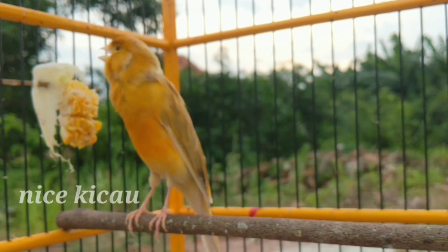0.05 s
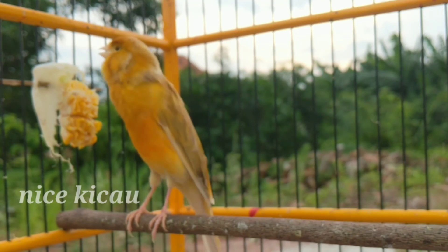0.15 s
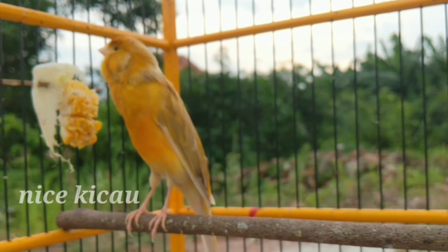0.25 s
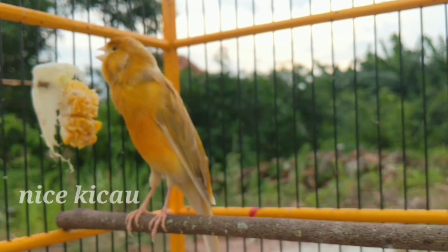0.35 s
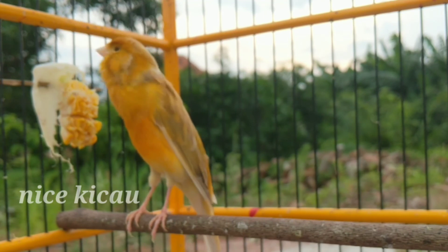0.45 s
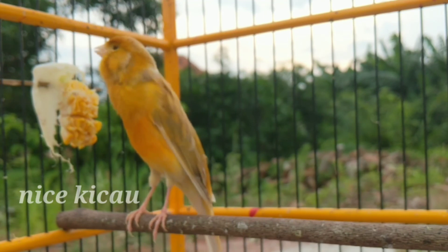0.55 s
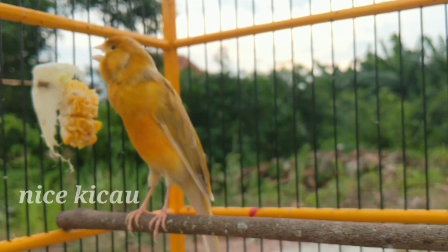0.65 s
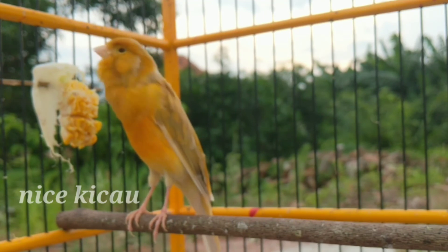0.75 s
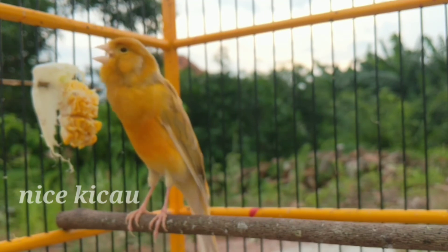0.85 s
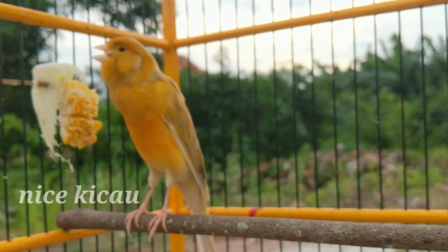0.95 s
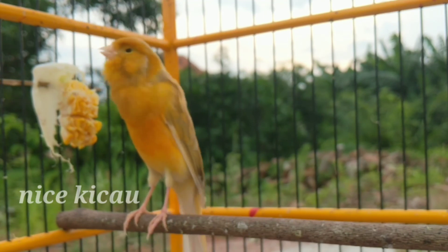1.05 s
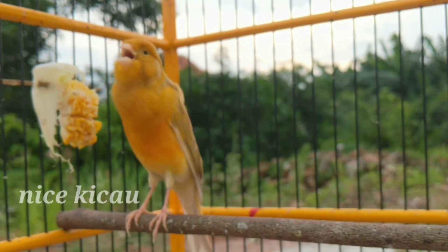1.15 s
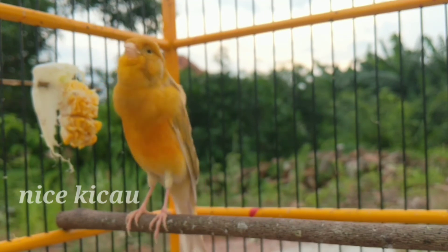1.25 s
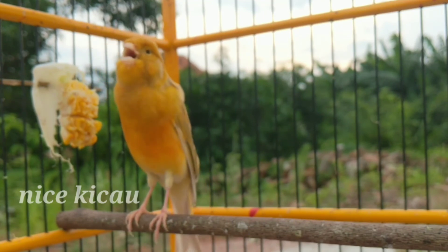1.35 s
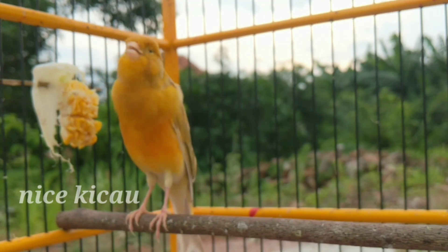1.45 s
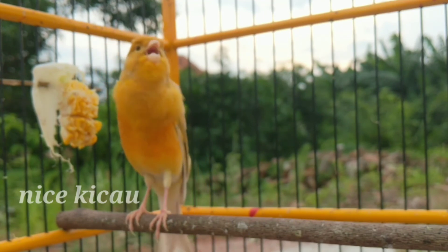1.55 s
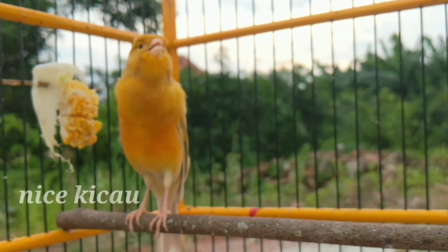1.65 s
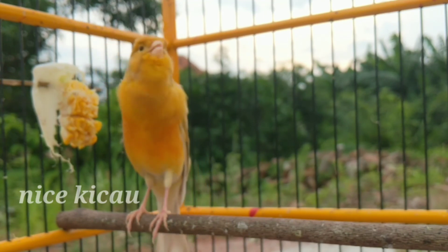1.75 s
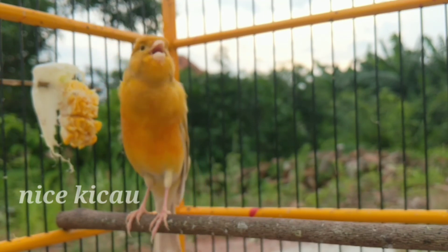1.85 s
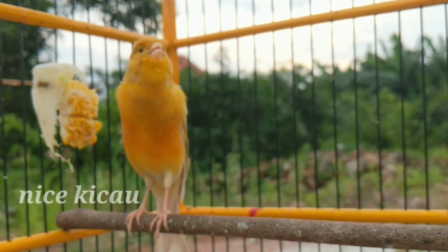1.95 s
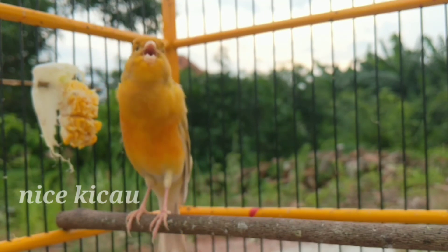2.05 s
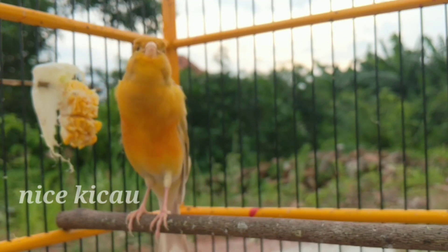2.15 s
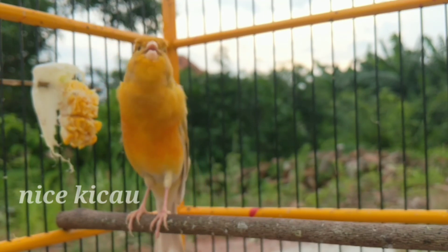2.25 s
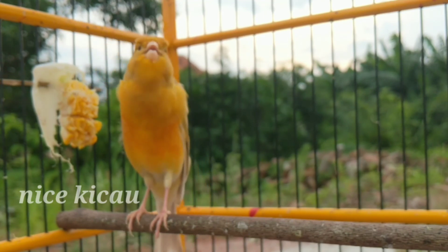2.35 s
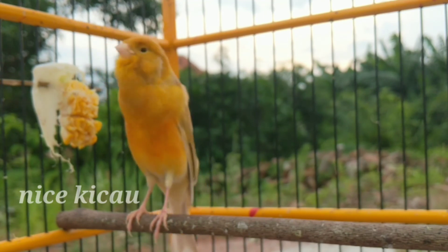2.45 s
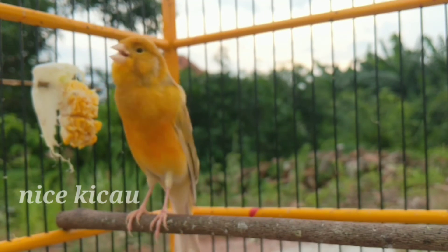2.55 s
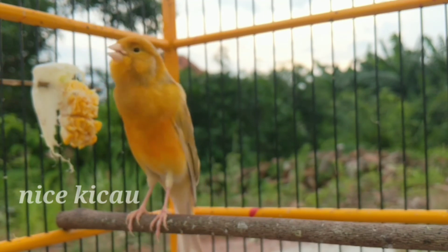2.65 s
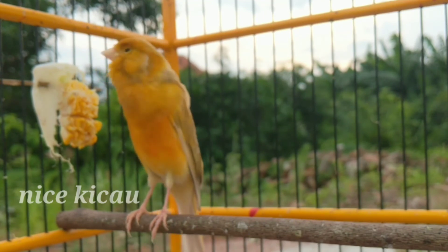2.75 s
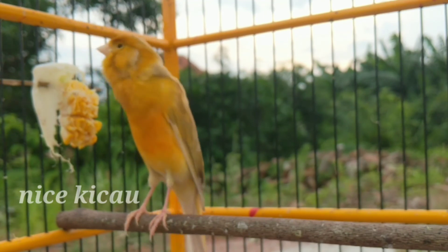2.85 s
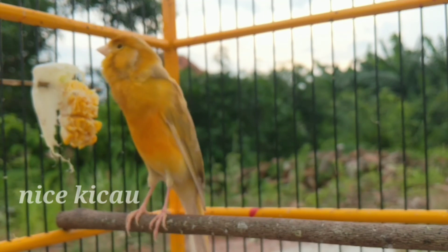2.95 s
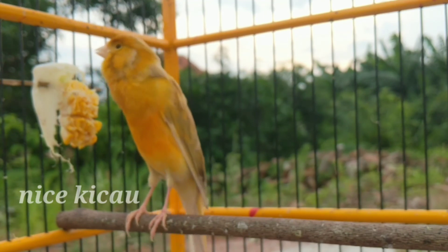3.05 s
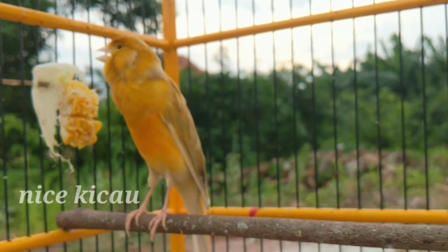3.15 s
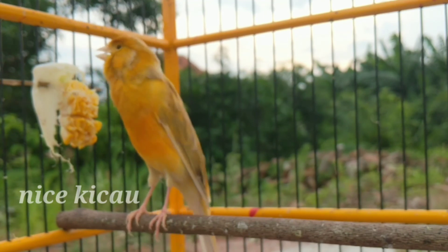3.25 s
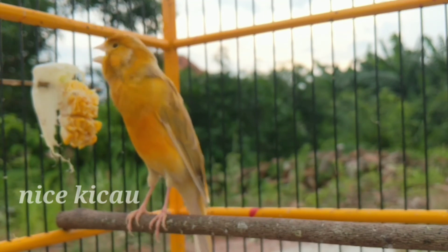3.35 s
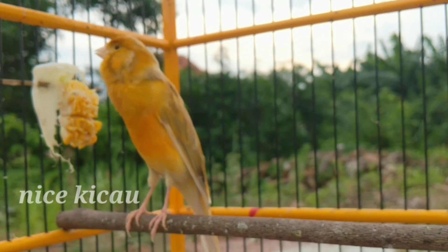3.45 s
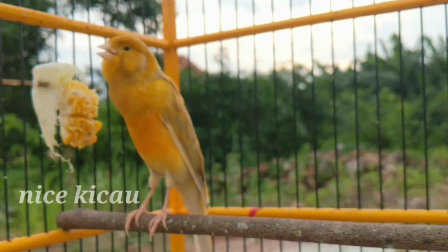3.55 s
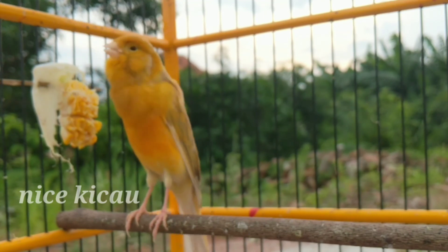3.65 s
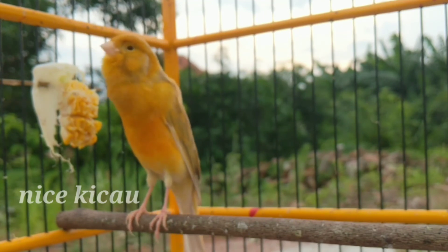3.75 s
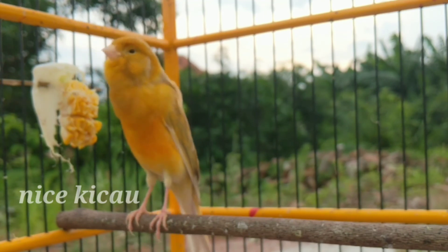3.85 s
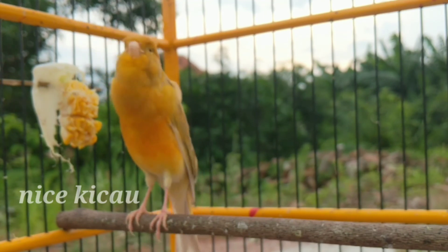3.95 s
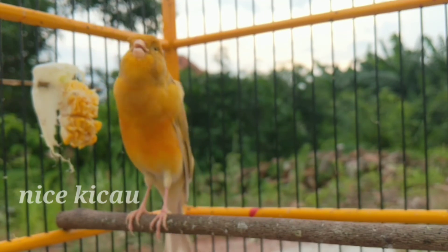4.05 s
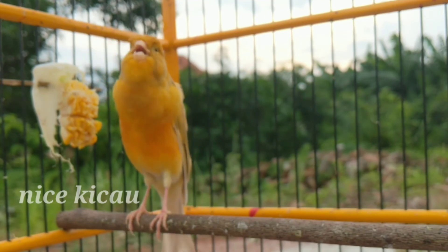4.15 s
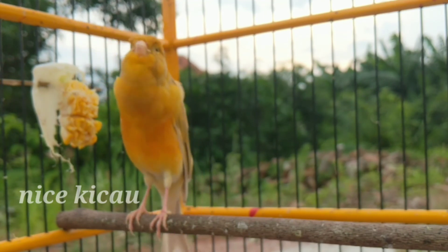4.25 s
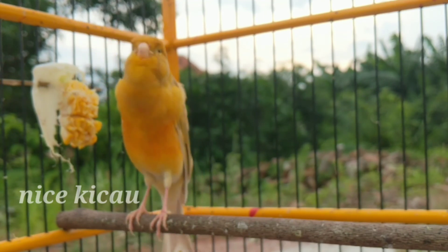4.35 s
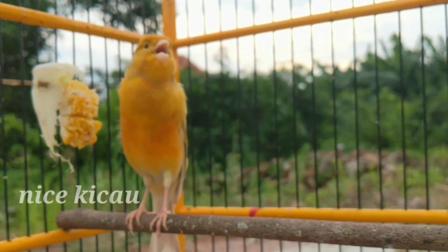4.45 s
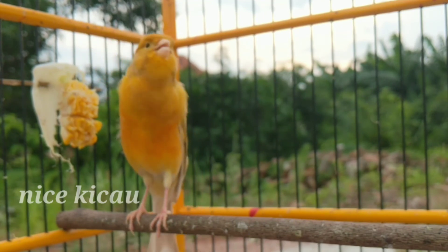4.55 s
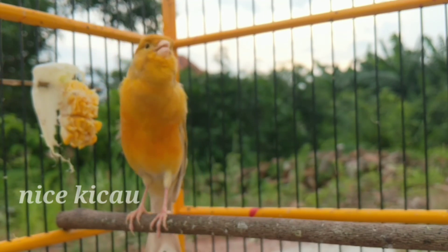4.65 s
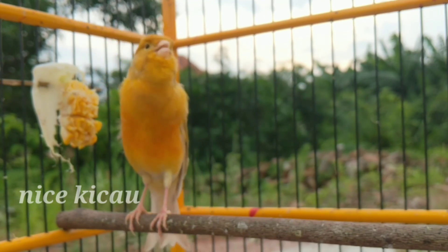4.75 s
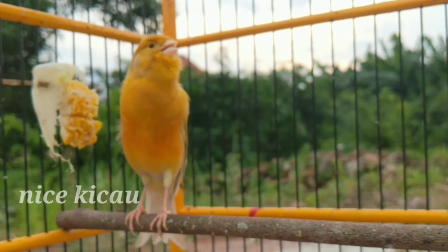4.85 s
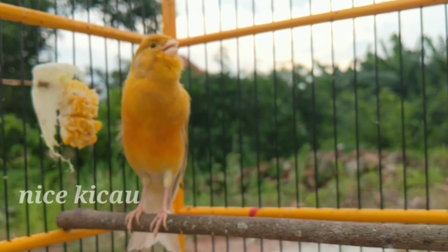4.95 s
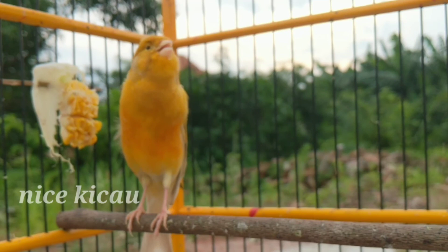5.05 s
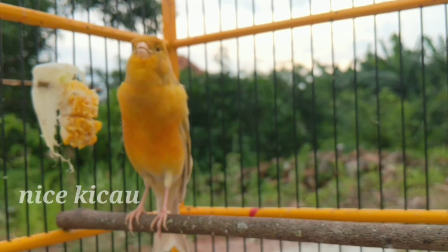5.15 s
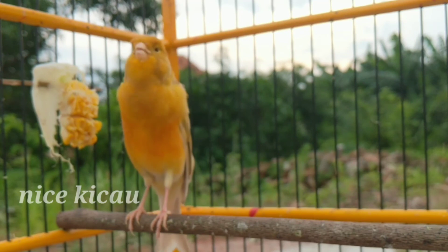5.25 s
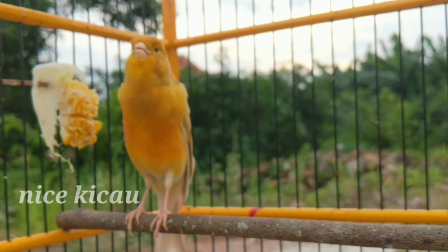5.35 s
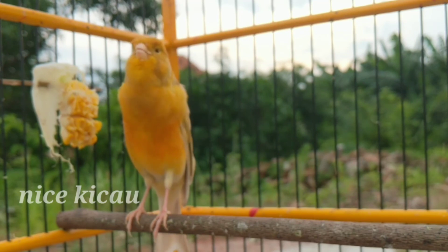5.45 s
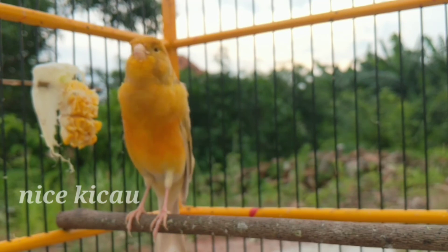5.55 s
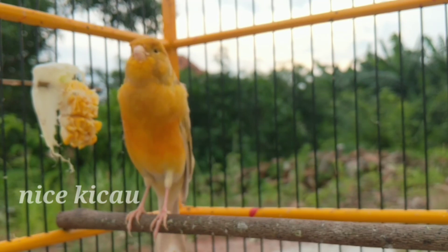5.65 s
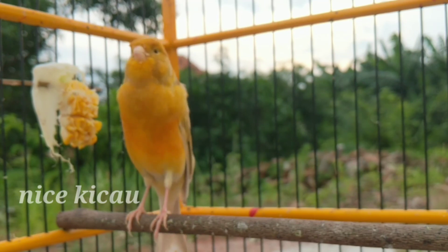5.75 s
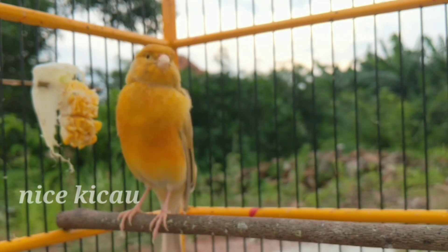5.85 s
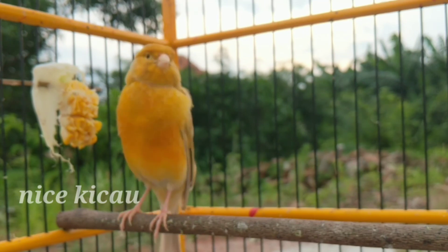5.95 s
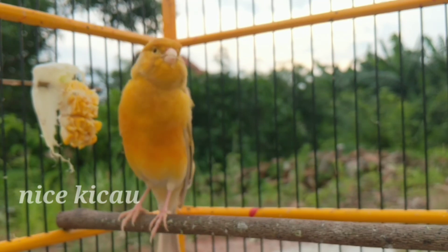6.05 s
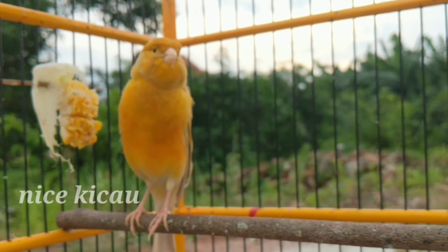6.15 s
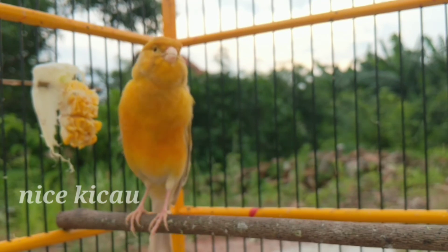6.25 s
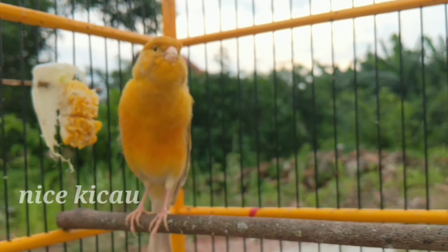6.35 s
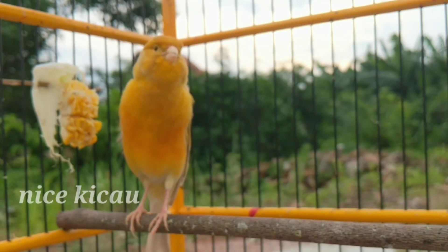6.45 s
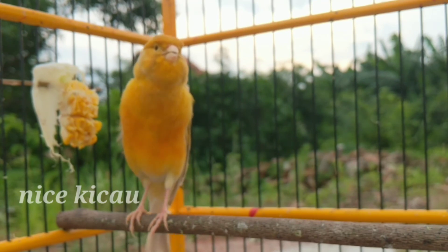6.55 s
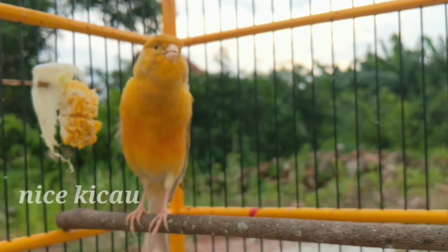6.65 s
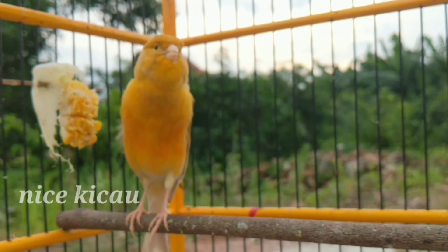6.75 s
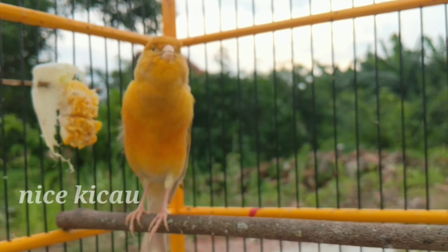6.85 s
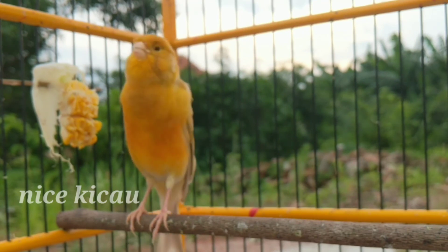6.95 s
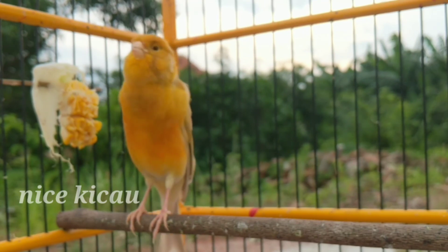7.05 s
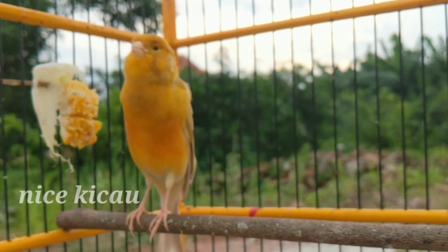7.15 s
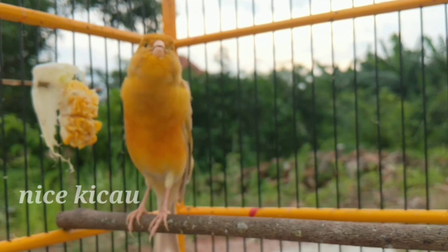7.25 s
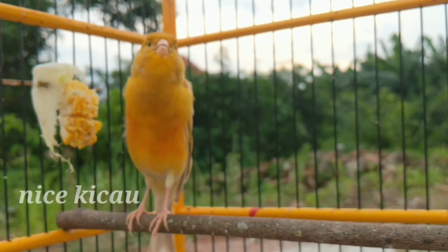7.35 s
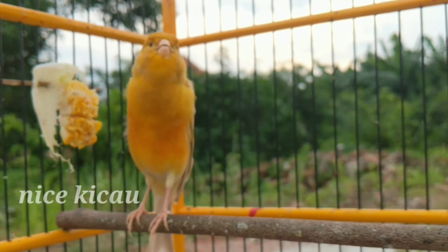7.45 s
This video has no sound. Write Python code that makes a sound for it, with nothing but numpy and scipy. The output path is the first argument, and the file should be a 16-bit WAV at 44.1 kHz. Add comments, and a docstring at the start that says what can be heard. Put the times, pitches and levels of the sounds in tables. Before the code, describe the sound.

A canary sings close by, running through raspy chirps, falling sweeps, a dry buzz, clear whistles and a fast soft roll over faint hum.

```python
"""A caged canary sings close to the microphone: falling sweeps, a buzz, pure whistles and a fast roll.
Each phrase repeats a syllable, a gliding tone whose overtones pass a resonance of throat and beak.
Nearby surfaces return short reflections of the song, and a faint reverberation follows it.
Far off, other birds hold notes and chirp upwards as smeared sine tones.
Behind them lie a distant engine's wavering hum, with rumble, and the coloured noise of outdoors."""
import sys
import numpy as np
from scipy import signal
from scipy.fft import rfft, irfft
from scipy.io import wavfile
from scipy.ndimage import map_coordinates

SR = 44100
rng = np.random.default_rng(int(sys.argv[2]) if len(sys.argv) > 2 else 0)


def wav_out(sig):
    """Save sig, one row per channel (or a flat mono array), as 16-bit PCM at SR to the path in sys.argv[1]."""
    wavfile.write(sys.argv[1], SR, np.round(np.clip(np.atleast_2d(sig).T, -1, 1) * 32767).astype(np.int16))


N = 330309
TIME = np.arange(N) / SR


def from_db(db):
    """Amplitude factor of a level in dB."""
    return 10 ** (np.asarray(db) / 20)


def rms_one(x):
    """Scale a signal to rms 1."""
    return x / np.sqrt(np.mean(x ** 2) + 1e-20)


def at_hz(points, hz):
    """Gain of a spectrum at the given frequencies, interpolated over log frequency."""
    knots, db = np.transpose(points)
    return from_db(np.interp(np.log(np.maximum(hz, 1)), np.log(knots), db))


def coloured(x, spectrum):
    """Shape the spectrum of a signal."""
    return irfft(rfft(x) * at_hz(spectrum, np.fft.rfftfreq(len(x), 1 / SR)), len(x))


def noise(spectrum, size=N):
    """Noise of a given colour, rms 1."""
    return rms_one(coloured(rng.standard_normal(size), spectrum))


def drift(t, rate):
    """Smooth chance with about `rate` turns a second."""
    steps = rng.standard_normal(4096)
    return map_coordinates(steps, [t * rate], order=3, mode="wrap")


def delayed(x, ms):
    """The same sound arriving later."""
    return np.interp(TIME - ms / 1000, TIME, x, left=0)


def reverberation(x, t60, colour, echoes_per_s=SR):
    """Late echoes that fall 60 dB in t60 seconds; a lower echo rate leaves them more separate."""
    t = TIME[:SR]
    arrivals = rng.standard_normal(SR) * (rng.random(SR) < echoes_per_s / SR)
    decay = from_db(-60 * t / t60) * (1 - np.exp(-t / 0.002))
    echoes = coloured(arrivals, colour) * decay
    return signal.fftconvolve(x, echoes / np.linalg.norm(echoes))[:N]


# level of the distant engine hum, before its flicker: t/s, level/dB
HUM_LEVEL = [(0.0, -50), (0.04, -42.5), (0.1, -38.5), (0.23, -46), (0.46, -41.5), (1.22, -63.5),
             (1.31, -48.5), (1.41, -74), (1.6, -46.5), (2.43, -51), (2.55, -56.5), (2.61, -46.5),
             (3.07, -49), (3.17, -39), (3.57, -57), (4.29, -66.5), (4.79, -40), (5.46, -46.5), (5.95, -42),
             (7.01, -55.5), (7.3, -38.5), (7.45, -37.5)]
# the engine's faint overtones: multiple of its pitch, level/dB re fundamental
HUM_OVERTONES = [(2, -36), (3, -37), (4, -35)]
# colour of the noise within the hum: f/Hz, relative level/dB
HUM_BAND = [(25, -32.5), (45, -9), (65, 10.5), (80, 6), (102, 6.5), (125, -7), (170, -20.5), (300, -54.5),
            (600, -126)]


def engine_hum():
    """A wavering low tone with faint overtones, mixed with noise around the same pitch."""
    centre_hz = 83.6
    turn = 2 * np.pi * np.cumsum(centre_hz * (1 + .055 * drift(TIME, 18))) / SR
    overtones = sum(from_db(db) * np.sin(round(k) * turn) for k, db in HUM_OVERTONES)
    firing = np.sqrt(2) * (np.sin(turn) + overtones)
    flicker = from_db(-0.5 + 0.31 * drift(TIME, 65))
    level = from_db(np.interp(TIME, *np.transpose(HUM_LEVEL)))
    return level * (flicker * firing + from_db(-3.5) * noise(HUM_BAND))


# brief swells of the low rumble, before a layer's gain: t/s, level/dB
SWELLS = [(0.8, -61.5), (1.0, -75), (3.08, -57), (3.411, -58), (3.679, -60.5), (3.92, -56.5), (4.75, -57),
          (5.181, -57), (6.762, -60.5), (7.13, -59.5)]


def low_swells():
    """Bell-shaped rises in level, shared by murmur and rumble."""
    width_s = 0.046
    return sum(from_db(db) * np.exp(-((TIME - s) / width_s) ** 2) for s, db in SWELLS)


# level of the outdoor murmur, before a 0.5 dB cut: t/s, level/dB
MURMUR_LEVEL = [(0.0, -59), (0.72, -62), (2.05, -69.5), (3.3, -59.5), (3.44, -64.5), (4.58, -68.5),
                (5.0, -54.5), (5.15, -64), (7.45, -58.5)]


def outdoor_murmur(swells):
    """Low-weighted noise whose slowly changing power and swells add."""
    outdoors = from_db(np.interp(TIME, *np.transpose(MURMUR_LEVEL)) - 0.5)
    colour = [(60, -3), (150, 4.5), (350, -2.5), (550, -13.5), (900, -18.0), (3000, -35.5)]  # f/Hz, dB
    return np.hypot(outdoors, swells) * noise(colour)


# colour of the rumble just above the hum: f/Hz, relative level/dB per Hz
RUMBLE = [(25, -11.5), (70, -4.5), (105, 6), (150, -9.5), (250, -28), (600, -66)]


def engine_rumble(swells):
    """Low noise that drifts in level and swells briefly."""
    level = from_db(-58 + 2.5 * drift(TIME, 12)) + from_db(8.5) * swells
    return level * noise(RUMBLE)


# colour of the broad outdoor noise: f/Hz, relative level/dB per Hz
AIR = [(20, -26), (50, -12), (90, -4), (200, -17), (400, -27), (800, -38), (1250, -35), (2000, -37),
       (4000, -39), (6500, -40), (10500, -38), (11800, -54), (15500, -58)]


def background():
    """A wavering engine hum with its rumble, and the broad noise of outdoors."""
    swells = low_swells()
    air = from_db(-63.0) * noise(AIR)
    return engine_hum() + outdoor_murmur(swells) + engine_rumble(swells) + air


# far birds' held notes, before smearing: t/s, length/s, starting f/Hz, level/dB
FAR_HELD = [(0.024, 0.076, 2418, -55), (0.587, 0.37, 451, -69), (4.194, 0.43, 1071, -76.5),
            (5.773, 0.063, 2227, -69), (5.924, 0.16, 343.7, -61.5), (5.992, 0.49, 1038, -71.5),
            (6.33, 0.066, 1517, -63), (6.895, 0.21, 374.3, -61.5)]
# far birds' upward chirps, before smearing: t/s, length/s, starting f/Hz, level/dB
FAR_CHIRPS = [(6.17, 0.027, 1516, -57.5), (6.254, 0.02, 1613, -57), (6.5, 0.228, 1037, -71),
              (6.804, 0.024, 1340, -60), (6.925, 0.026, 1647, -54), (7.033, 0.064, 1762, -56.5),
              (7.279, 0.14, 2120, -61.5), (7.43, 0.044, 2440, -49.5)]


def far_birds():
    """Soft held notes and upward chirps, smeared by the distance; the low notes are the hoarsest."""
    sag, rise = 0.95, 1.12  # end pitch over starting pitch
    waver_hz = 24  # the same in Hz for every note, so proportionally widest on low ones
    out = np.zeros(N + SR)
    for notes, glide in ((FAR_HELD, sag), (FAR_CHIRPS, rise)):
        for start, length, from_hz, db in notes:
            t = TIME[:int(length * SR)]
            hz = from_hz * np.linspace(1, glide, len(t)) + waver_hz * drift(t, 90)
            tone = np.sin(2 * np.pi * np.cumsum(hz) / SR)
            first = max(int(start * SR), 0)
            out[first:first + len(t)] += from_db(db) * signal.windows.tukey(len(t)) * tone
    return reverberation(out[:N], t60=0.82, colour=[(500, 3.0), (15000, -5.5)])


# reflections off nearby surfaces: delay t/ms, level/dB re song
REFLECTIONS = [(1.05, -32.5), (2.9, -21), (6.4, -23), (13, -28), (34, -48), (62, -45.5), (90, -56.5)]


def near_reflections(song):
    """Each nearby surface returns a later, weaker copy of the song."""
    return sum(from_db(db) * delayed(song, ms) for ms, db in REFLECTIONS)


# colour of the faint reverberation: f/Hz, relative level/dB
TAIL = [(1000, 7), (2500, 4), (3900, -5), (5500, -9), (7000, -5), (9000, -7), (15000, -20)]


def faint_tail(song):
    """Separate faint echoes of the song that die away."""
    return from_db(-35.5) * reverberation(song, t60=0.71, colour=TAIL, echoes_per_s=400)


# what throat and beak let through of the overtones: f/Hz, gain/dB
THROAT = [(2500, 4.5), (4500, -15), (6000, -19.5), (7300, -17), (8700, 1.5), (9400, -3.5), (10500, -12),
          (12500, -18), (15500, -19.5)]
# overtones at the syrinx: multiple of the pitch, level/dB before flicker
OVERTONES = [(2, -2), (3, -3.5), (4, -12.5), (5, -18)]
# colour of the rasp in fast syllables: f/Hz, relative level/dB
RASP = [(1000, -5.5), (3000, -0.5), (5000, 11), (7300, -7.5), (9200, 1.5), (11500, -13), (15000, -22.5)]


# Shapes give t/ms and f/Hz at length and pitch factor 1; their level/dB adds to each note's level/dB.
def phrase(shape, times, overtone_db, rough, rasp_db, flutter_db=1.5, waver=0.002):
    """One syllable repeated; pitch and level waver a little, jitter and rasp roughen the tone."""
    ms, pitch, level = np.transpose(shape)
    out = np.zeros(N + SR)
    hiss = noise(RASP, size=SR)
    for start, note_db, stretch, transpose in times:
        t = TIME[:int(ms[-1] * stretch * SR / 1000)]
        along = 1000 * t / stretch
        wobble = 1 + waver * drift(t, 150) + rough * drift(t, 2500)
        hz = transpose * np.interp(along, ms, pitch) * wobble
        phase = 2 * np.pi * np.cumsum(hz) / SR
        edge = np.clip(np.minimum(t, t[-1] - t) / .001, 0, 1)
        gate = np.sin(np.pi / 2 * edge) ** 2
        swell = from_db(np.interp(along, ms, level) + flutter_db * drift(t, 170))
        overtones = 0
        for k, db in OVERTONES:
            # each overtone flickers on its own
            flicker = from_db(db + 2 * flutter_db * drift(t, 250))
            passed = at_hz(THROAT, k * hz) * (k * hz < SR / 2)
            overtones = overtones + flicker * passed * np.sin(round(k) * phase)
        # the rasp comes in small spurts while the tone sounds
        spurts = from_db(rasp_db + 1.3 * drift(t, 200))
        rasp = np.roll(hiss, rng.integers(SR))[:len(t)] * spurts
        # the beak is tuned to the fundamental, so overtones and rasp swell less than it does
        tone = swell * np.sin(phase) + swell ** 0.86 * (from_db(overtone_db) * overtones + rasp)
        first = max(int(start * SR), 0)
        out[first:first + len(t)] += from_db(note_db) * gate * tone
    return out[:N]


RIPPLE_MS, RIPPLE_DB = 1.283, -8  # delay and level of a very near echo
# how strongly the voice carries at each pitch: f/Hz, level/dB
CARRY = [(1200, -40), (2000, -23.5), (3000, -15.5), (3900, -4), (4600, -7), (5400, 0), (6200, -4),
         (7200, -13.5)]


def falling(contour, attack_ms, release_ms):
    """Shape of a falling syllable: fades at both ends, loudest where its pitch carries best."""
    fade_db = 18.5  # depth of attack and release
    knots, pitch = np.transpose(contour)
    ms = np.linspace(0, knots[-1], num=200)
    hz = np.interp(ms, knots, pitch)
    # the near echo ripples the level as the pitch slides
    ripple = np.abs(1 + from_db(RIPPLE_DB) * np.exp(-2j * np.pi * hz * RIPPLE_MS / 1000))
    opening = np.clip(np.minimum(ms / attack_ms, (ms[-1] - ms) / release_ms), 0, 1)
    level = 20 * np.log10(at_hz(CARRY, hz) * ripple) + fade_db * (opening - 1)
    return np.column_stack([ms, hz, level])


def trill(runs, settling, scatter_db, pitch_scatter):
    """Notes evenly spaced in each run; level, length and pitch settle, then hold with some scatter."""
    s = np.concatenate([np.linspace(first, last, round((last - first) * rate) + 1)
                        for first, last, rate in runs])
    since, *columns = np.transpose(settling)
    db, stretch, transpose = [np.interp(s - s[0], since, column) for column in columns]
    louder, higher = rng.standard_normal((len(s), 2)).T
    transpose = transpose * (1 + pitch_scatter * higher)
    return np.column_stack([s, db + scatter_db * louder, stretch, transpose])


# low falling slur: t/ms, f/Hz, level/dB
LOW_SLUR = [(0, 2570, -7.5), (22.1, 2310, -9.5), (41.8, 2180, -22), (55, 1960, -22)]
# its note: t/s, level/dB, length factor, pitch factor
LOW_SLUR_AT = [(0.0, -25, 1, 0.94)]


def low_slur():
    """A low tone sinks and fades."""
    return phrase(LOW_SLUR, LOW_SLUR_AT, overtone_db=-17.5, rough=0.0082, rasp_db=-28.5)


# opening syllable: t/ms, f/Hz, level/dB
OPENER = [(0, 6300, -18), (5, 7180, -24), (27, 6070, -17.5), (37, 5340, -4), (44.4, 4720, -3.5),
          (52.3, 3830, -10), (56.6, 3200, -42), (64, 3200, -14), (68, 1600, -35)]
# its note: t/s, level/dB, length factor, pitch factor
OPENER_AT = [(0.091, -20.5, 0.99, 1)]


def opener():
    """One steep fall, strongest midway."""
    return phrase(OPENER, OPENER_AT, overtone_db=-23, rough=0.0043, rasp_db=-31.0)


# short sharp falling syllable: t/ms, f/Hz, level/dB
TSIP = [(0, 5300, -26), (9, 7600, -22), (17, 6300, -21), (22, 5450, -4), (27.5, 4850, 1.5),
        (34.5, 4100, -6), (38.5, 3600, -30), (43, 3250, -6), (47, 2500, -11), (54, 1150, -32)]
# its notes: t/s, level/dB, length factor, pitch factor
TSIP_AT = [(0.184, -27.5, 0.9, 1.0), (0.2457, -25, 1.085, 0.97), (0.328, -24, 0.92, 0.97),
           (0.4007, -25, 0.88, 1.0), (0.4643, -24, 1.11, 0.98), (0.545, -25, 0.82, 0.91),
           (0.6156, -23.5, 1.015, 0.99), (0.684, -23.5, 1.08, 1.0), (0.7675, -24, 0.98, 0.97),
           (0.843, -22.5, 0.98, 0.98)]


def tsips():
    """A run of short, raspy falls."""
    return phrase(TSIP, TSIP_AT, overtone_db=-20.0, rough=0.011, rasp_db=-26)


# tiny upward flick: t/ms, f/Hz, level/dB
FLICK = [(0, 5200, -15), (2, 5650, 6.5), (4.5, 6100, -29)]
# its notes: t/s, level/dB, length factor, pitch factor
FLICK_AT = [(0.327, -35, 1, 1), (0.4, -34, 1, 1), (0.465, -34, 1, 1), (0.615, -33, 1, 1),
            (3.4585, -29.5, 1, 0.92)]


def flicks():
    """Quick upward glides open some of the falling notes."""
    return phrase(FLICK, FLICK_AT, overtone_db=-23, rough=.01, rasp_db=-45)


# long falling sweep: t/ms, f/Hz
SWEEP = [(0, 6400), (6.5, 7240), (16.6, 7030), (36.4, 6270), (55, 5834), (112.7, 3960), (136.5, 2975),
         (150, 2150), (156, 360)]
# its notes: t/s, level/dB, length factor, pitch factor
SWEEP_AT = [(0.9178, -19.5, 0.78, 0.99), (1.075, -19, 0.9, 1), (1.2478, -18, 0.92, 1.0),
            (1.427, -18, 0.91, 1), (1.6023, -18.5, 0.91, 1.0), (1.7816, -19, 0.9, 0.99),
            (1.958, -18, 0.91, 1.0), (2.142, -18, 0.87, 1)]


def sweeps():
    """Long, pure falls with a slow attack."""
    shape = falling(SWEEP, attack_ms=90, release_ms=3)
    return phrase(shape, SWEEP_AT, overtone_db=-20.5, rough=0.0067, rasp_db=-45)


# falling slur: t/ms, f/Hz
SLUR = [(0, 6900), (8, 6710), (19.7, 6160), (45.7, 4130), (55.3, 3980), (80, 3040), (122, 1010)]
# its notes: t/s, level/dB, length factor, pitch factor
SLUR_AT = [(2.3403, -21, 0.89, 0.95), (2.4842, -20, 0.95, 0.96), (2.642, -19, 0.92, 0.97),
           (2.792, -19.5, 0.94, 0.97)]


def slurs():
    """Falls that start more promptly than the sweeps."""
    shape = falling(SLUR, attack_ms=7.3, release_ms=1)
    return phrase(shape, SLUR_AT, overtone_db=-18.5, rough=0.0036, rasp_db=-42)


# tick: t/ms, f/Hz, level/dB
TICK = [(0.0, 3660, -30), (1.5, 3670, 7.5), (4.0, 2945, 7), (7.0, 3290, 10)]
# its notes: t/s, level/dB, length factor, pitch factor
TICK_AT = [(2.3284, -42.5, 0.49, 1.28), (2.483, -47.5, 0.37, 1.27), (2.63, -39.5, 0.55, 1.26),
           (2.9356, -45, 0.53, 1.11), (3.3958, -40.5, 0.58, 0.96), (3.8711, -43.5, 0.82, 0.98),
           (4.0366, -40.5, 0.87, 0.98), (4.2018, -41.5, 0.7, 1.005), (4.3566, -44.5, 0.98, 1.01),
           (4.5236, -41.5, 1, 1)]


def ticks():
    """Soft, rough clicks of tone between the larger syllables."""
    return phrase(TICK, TICK_AT, overtone_db=-14.0, rough=0.023, rasp_db=-23)


# low falling stroke: t/ms, f/Hz, level/dB
CHATTER = [(0, 3170, -14), (2, 2610, 2.5), (4, 1720, -6), (8, 1350, -17.5), (13, 1300, -25)]
# its notes: t/s, level/dB, length factor, pitch factor
CHATTER_AT = [(2.946, -45.5, 2.3, 0.95), (2.987, -37, 0.98, 0.92), (3.0238, -36, 1.17, 1),
              (3.059, -36.5, 1.24, 0.99), (3.083, -36, 1.3, 1), (3.1241, -37.5, 1.06, 0.91)]
# upward hiccup: t/ms, f/Hz, level/dB
HICCUP = [(0, 2100, -16), (2, 2500, -9.5), (4, 2950, -6), (6.5, 3080, 1)]
# its notes: t/s, level/dB, length factor, pitch factor
HICCUP_AT = [(2.968, -33.5, 0.82, 0.91), (3.0048, -34.5, 0.8, 0.92), (3.0409, -27, 0.58, 0.91),
             (3.077, -26, 0.58, 0.854), (3.1036, -32.5, 0.8, 0.87)]


def chatter():
    """Low falling strokes alternate with upward hiccups; a brief ringing tangles them together."""
    strokes = (phrase(CHATTER, CHATTER_AT, overtone_db=-14, rough=0.058, rasp_db=-31)
               + phrase(HICCUP, HICCUP_AT, overtone_db=-9.5, rough=.04, rasp_db=-40))
    colour = [(1200, -11), (2300, -5.5), (3000, 3.5), (4200, 5.5),
              (7000, -9), (9000, 2), (12000, -21)]  # f/Hz, dB
    ringing = reverberation(strokes, t60=0.13, echoes_per_s=1200, colour=colour)
    return strokes + from_db(-14) * ringing


# rising tone: t/ms, f/Hz, level/dB
RISE = [(0, 2450, -24), (10, 3400, -10), (38, 4040, -6), (55, 4470, -1), (91, 4850, -2.5), (135, 5070, -8),
        (170, 5020, -13), (176, 4960, -26)]
# its note: t/s, level/dB, length factor, pitch factor
RISE_AT = [(3.19, -25, 0.98, 1.0)]


def rising_tone():
    """One pure, slowly rising tone."""
    return phrase(RISE, RISE_AT, overtone_db=-25, rough=0.00058, rasp_db=-65, waver=0.0024)


# low upward pip: t/ms, f/Hz, level/dB
PIP = [(0, 1360, -23), (4.03, 1750, -6.5), (9.8, 2150, -12.5), (16.8, 2330, 0), (24.7, 2360, -1.5),
       (29.0, 2300, -38)]
# its notes: t/s, level/dB, length factor, pitch factor
PIP_AT = [(3.409, -35, 0.91, 0.95), (3.6333, -34.5, 0.98, 0.98)]


def pips():
    """Soft low pips lead into the tews."""
    return phrase(PIP, PIP_AT, overtone_db=-9.5, rough=0.009, rasp_db=-35.0)


# falling "tew": t/ms, f/Hz
TEW = [(0, 3940), (5.5, 6700), (12, 6660), (24, 6100), (46.5, 4750), (62.6, 3940), (96.5, 3023),
       (130, 2910), (162, 2950)]
# its notes: t/s, level/dB, length factor, pitch factor
TEW_AT = [(3.4573, -22, 0.91, 0.98), (3.6821, -19.5, 0.98, 1.0)]


def tews():
    """After a quick leap up, a long fall that levels out."""
    shape = falling(TEW, attack_ms=11, release_ms=24)
    return phrase(shape, TEW_AT, overtone_db=-19, rough=0.0036, rasp_db=-47)


# low grace note: t/ms, f/Hz, level/dB
GRACE = [(0, 2900, -21), (5.01, 1650, -14.5), (10, 1800, -9.5), (20.1, 2230, -10.5), (27.7, 2540, 1.5),
         (33.6, 3010, -2.5), (40.9, 3000, -7), (41.4, 3200, -33)]
# its notes: t/s, level/dB, length factor, pitch factor
GRACE_AT = [(3.884, -35.5, 0.94, 0.9), (4.0555, -37, 0.82, 0.94), (4.219, -39, 0.77, 0.94),
            (4.3764, -37.5, 0.83, 0.96), (4.5364, -38, 0.8, 0.95)]


def grace_notes():
    """Soft, rough notes that dip and climb before each whip."""
    return phrase(GRACE, GRACE_AT, overtone_db=-10, rough=0.027, rasp_db=-27.5)


# short spit: t/ms, f/Hz, level/dB
SPIT = [(0.0, 5410, -33), (2.0, 5130, 3), (5.0, 4100, -18)]
# its notes: t/s, level/dB, length factor, pitch factor
SPIT_AT = [(3.927, -28, 0.86, 0.82), (4.2493, -29.5, 1.47, 1.0), (4.4116, -30, 1.3, 0.99),
           (4.5713, -27, 1.27, 1.0)]


def spits():
    """Very short, raspy falls just before most whips."""
    return phrase(SPIT, SPIT_AT, overtone_db=-6.5, rough=0.031, rasp_db=-21)


# steep falling whip: t/ms, f/Hz
WHIP = [(0, 7400), (2.6, 6530), (6.5, 6150), (13, 5400), (29, 4080), (47.6, 2290), (60, 1000), (65.5, 1460)]
# its notes: t/s, level/dB, length factor, pitch factor
WHIP_AT = [(3.937, -19.5, 1.06, 0.97), (4.0907, -19, 1.113, 0.99), (4.2631, -18, 0.92, 1),
           (4.4244, -19, 0.92, 0.99), (4.5823, -18.5, 1.055, 1)]


def whips():
    """Steep falls through most of the voice's range."""
    shape = falling(WHIP, attack_ms=6, release_ms=2)
    return phrase(shape, WHIP_AT, overtone_db=-18, rough=0.016, rasp_db=-41)


# steep stroke of the buzz: t/ms, f/Hz, level/dB
BUZZ = [(0, 3500, -28), (2, 4000, -18), (4.3, 4400, -32), (6.4, 4700, -26), (7.5, 3750, 0), (8.3, 3400, -9),
        (9, 3050, -1), (10.8, 2650, -14), (14, 2600, -28)]
# even runs with a stumble between them: first note t/s, last note t/s, approximate rate/(notes per s)
BUZZ_RUNS = [(4.7022, 4.8377, 52), (4.8668, 4.9972, 46), (5.0164, 5.0751, 51)]
# how the buzz settles, before scatter: t/s since its start, level/dB, length factor, pitch factor
BUZZ_SETTLING = [(0, -29, 0.8, 0.92), (0.051, -23.5, 1, 0.94), (0.13, -21, 1, 0.98)]
# soft strokes that open and close the buzz: t/s, level/dB, length factor, pitch factor
SOFT_STROKES_AT = [(4.6747, -31.5, 1, 0.98), (5.1052, -37.6, 0.92, 1.04)]
# colour of the ringing that fills its gaps: f/Hz, relative level/dB
BUZZ_RING = [(2600, -18.5), (3100, -7), (3500, -9.5), (3950, 5), (4500, -14), (7000, -6), (9200, 5.5),
             (10200, -2), (12000, -23)]


def buzz():
    """A dry rattle of steep strokes with a near echo and brief ring; the throat passes nothing low."""
    notes = trill(BUZZ_RUNS, BUZZ_SETTLING, scatter_db=0.6, pitch_scatter=0.0301)
    times = np.vstack([notes, SOFT_STROKES_AT])
    strokes = phrase(BUZZ, times, overtone_db=-13, rough=.03, rasp_db=-22)
    strokes = signal.sosfilt(signal.butter(8, 2650, "high", fs=SR, output="sos"), strokes)
    strokes = signal.sosfilt(signal.butter(2, 11000, fs=SR, output="sos"), strokes)
    strokes = strokes + from_db(RIPPLE_DB) * delayed(strokes, RIPPLE_MS)
    return strokes + from_db(-17) * reverberation(strokes, t60=0.1, colour=BUZZ_RING)


# upbeat: t/ms, f/Hz, level/dB
UPBEAT = [(0, 2200, -36), (3, 3900, -34), (8, 5400, -7), (12, 6000, -3), (18, 6150, 2), (24, 6080, -10),
          (29, 6100, -20), (33, 6100, -37)]
# its notes: t/s, level/dB, length factor, pitch factor
UPBEAT_AT = [(5.154, -24, 0.84, 1.0), (5.4067, -27, 0.88, 1.0)]


def upbeats():
    """A short high upward note ahead of each whistle."""
    return phrase(UPBEAT, UPBEAT_AT, overtone_db=-14, rough=.004, rasp_db=-36.5)


# first whistle: t/ms, f/Hz, level/dB
WHISTLE = [(0, 3127, -35), (6, 3123, -13), (15, 3114, -2), (30, 3094, 2), (60, 3064, -2), (100, 3055, -5),
           (135, 3062, -8), (155, 3092, -12), (166, 3100, -45)]
# its note: t/s, level/dB, length factor, pitch factor
WHISTLE_AT = [(5.196, -24, 1, 1)]
# second whistle: t/ms, f/Hz, level/dB
LIFT = [(0, 3136, -41), (6, 3131, -19), (16, 3092, -7), (32, 3046, -1), (60, 3029, -3), (100, 3045, -6),
        (135, 3086, -8), (162, 3130, -14), (173, 3148, -41)]
# its note: t/s, level/dB, length factor, pitch factor
LIFT_AT = [(5.447, -24, 1, 1)]


def held_whistles():
    """Two pure, steady whistles; the second lifts at its end."""
    pure = dict(overtone_db=-17.5, rough=.0006, rasp_db=-58, flutter_db=.3, waver=.001)
    return phrase(WHISTLE, WHISTLE_AT, **pure) + phrase(LIFT, LIFT_AT, **pure)


def full_song():
    """The open-beaked phrases: fast syllables are raspy, held ones pure."""
    return (low_slur() + opener() + tsips() + flicks() + sweeps() + slurs() + ticks()
            + chatter() + rising_tone() + pips() + tews() + grace_notes() + spits() + whips()
            + buzz() + upbeats() + held_whistles())


# soft rising tone: t/ms, f/Hz, level/dB
SOFT_RISE = [(0, 3720, -19), (6.1, 3970, 1.5), (34, 4110, -1), (62, 4570, 3), (99, 4860, -1),
             (139, 5060, 2.5), (169.5, 5060, -3.5), (170, 4980, -20)]
# its note: t/s, level/dB, length factor, pitch factor
SOFT_RISE_AT = [(6.073, -41, 1, 1.0)]


def soft_rise():
    """One quiet rising tone with a wider waver."""
    return phrase(SOFT_RISE, SOFT_RISE_AT, overtone_db=-12.5, rough=0.0018, rasp_db=-49,
                  flutter_db=2.1, waver=0.0049)


# quiet falling zip: t/ms, f/Hz, level/dB
ZIP = [(0, 7000, -26), (11, 5360, 0), (16.8, 4400, -6), (24.4, 3750, 5), (27.2, 2860, -1), (29, 3300, -22),
       (32, 3900, -5), (38, 3850, -20)]
# its notes: t/s, level/dB, length factor, pitch factor
ZIP_AT = [(6.3526, -41.5, 1, 1.0), (6.3977, -42, 0.81, 1.0), (6.4368, -41.5, 0.84, 0.98),
          (6.4722, -40, 0.75, 0.97), (6.511, -39, 1, 0.96), (6.5559, -37.5, 1, 0.96),
          (6.6027, -38, 0.8, 0.97), (6.638, -41, 0.82, 0.9), (6.684, -37, 0.84, 0.99)]


def zips():
    """A run of quiet, rough falls."""
    return phrase(ZIP, ZIP_AT, overtone_db=-12.5, rough=0.049, rasp_db=-25)


# rising note of the roll: t/ms, f/Hz, level/dB
ROLL = [(0, 2400, -28), (4, 3150, -16), (8, 3550, -5), (11, 3760, 0), (13.5, 3900, 1.5), (16.5, 4080, -6),
        (19.5, 4150, -19), (22, 4100, -33)]
# even runs with a stumble between them: first note t/s, last note t/s, approximate rate/(notes per s)
ROLL_RUNS = [(6.7755, 6.9635, 37), (6.9835, 7.0734, 33), (7.0985, 7.2075, 37), (7.2264, 7.317, 33),
             (7.3447, 7.4585, 35), (7.479, 7.508, 35)]
# how the roll settles, before scatter: t/s since its start, level/dB, length factor, pitch factor
ROLL_SETTLING = [(0, -33, 1.06, 0.93), (0.032, -27, 0.88, 0.94), (0.3, -28.5, 0.75, 0.985)]


def roll():
    """A fast trill of clean, rising notes."""
    times = trill(ROLL_RUNS, ROLL_SETTLING, scatter_db=0.5, pitch_scatter=.008)
    return phrase(ROLL, times, overtone_db=-21, rough=0.0015, rasp_db=-49, flutter_db=0.6)


def soft_song():
    """The last phrases come through a nearly closed beak, which dulls the very top."""
    voice = soft_rise() + zips() + roll()
    return signal.sosfilt(signal.butter(6, 10500, fs=SR, output="sos"), voice)


def canary():
    """The whole song: the loud phrases, then the soft ending."""
    return full_song() + soft_song()


def scene():
    """The close canary with its echoes, over far birds and the outdoor background."""
    song = canary()
    return (background() + far_birds() + near_reflections(song) + faint_tail(song) + song)[None]


def record(dry):
    """The top is cut steeply."""
    cutoff_hz = 15600
    return signal.sosfilt(signal.ellip(10, .1, 80, cutoff_hz, fs=SR, output="sos"), dry)


dry = scene()
out = record(dry)
wav_out(out)
```